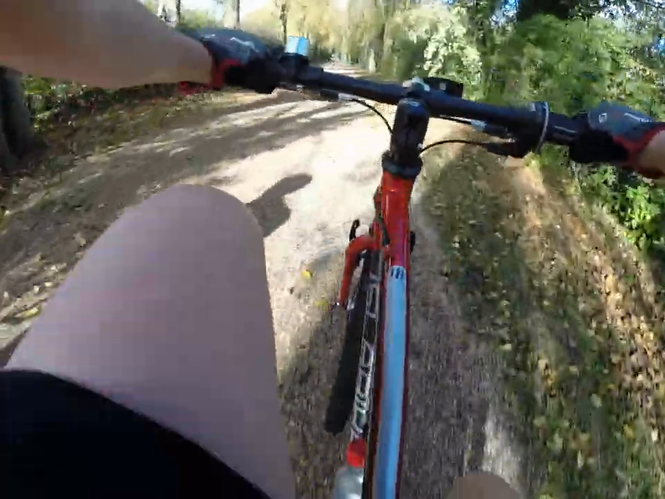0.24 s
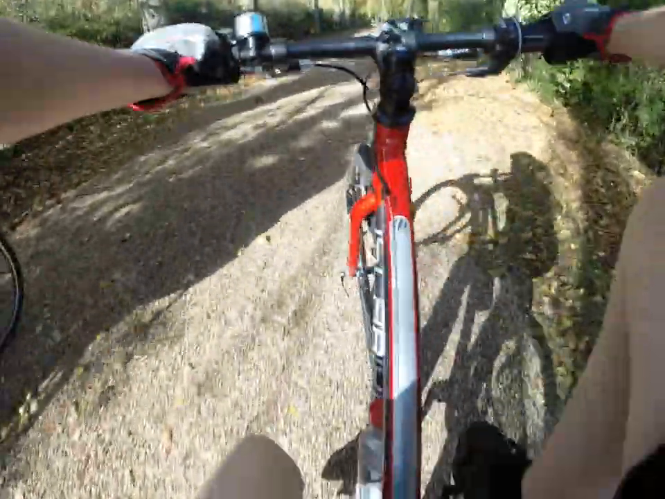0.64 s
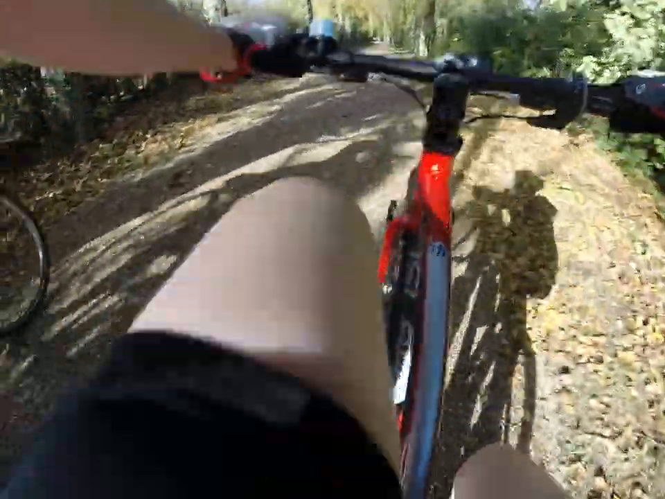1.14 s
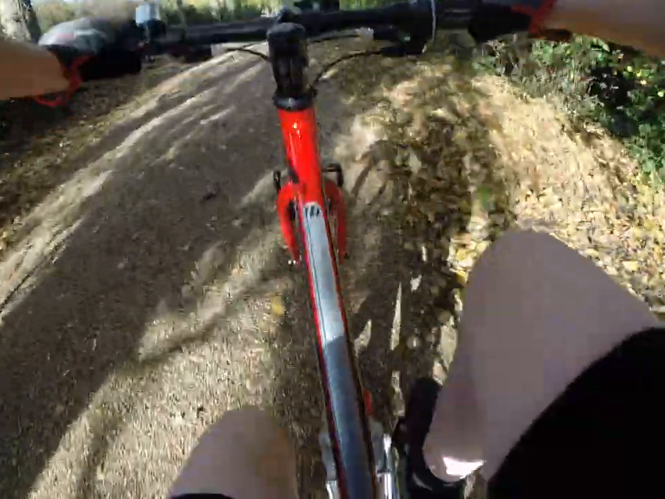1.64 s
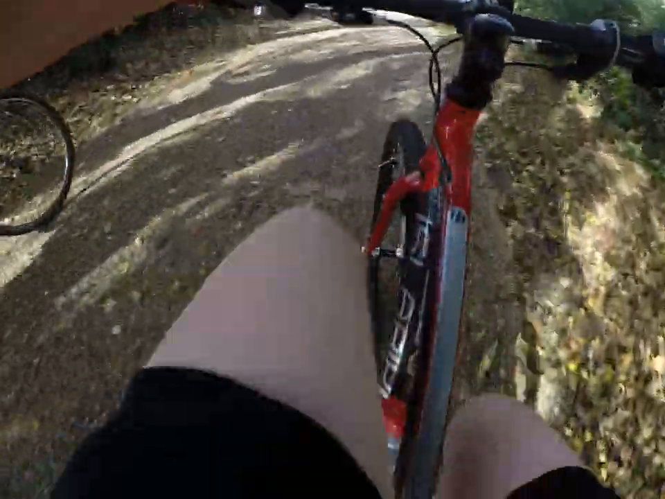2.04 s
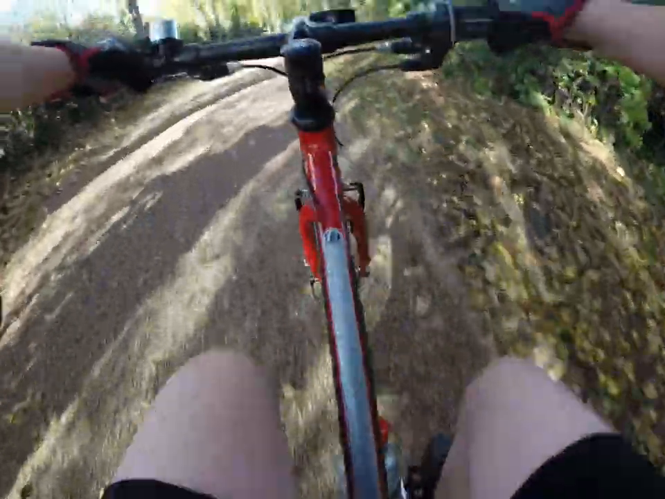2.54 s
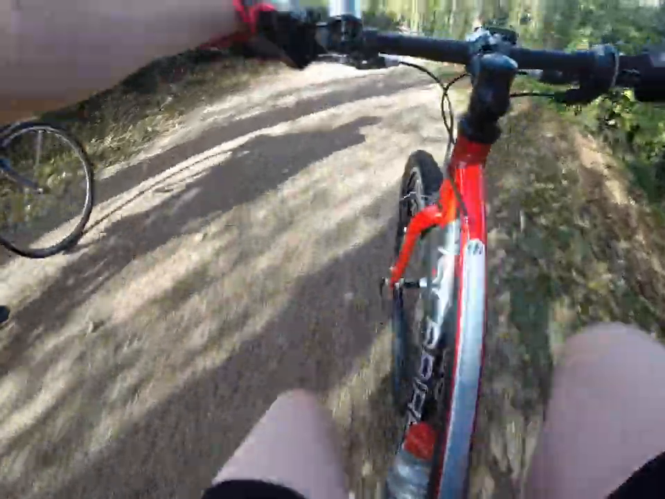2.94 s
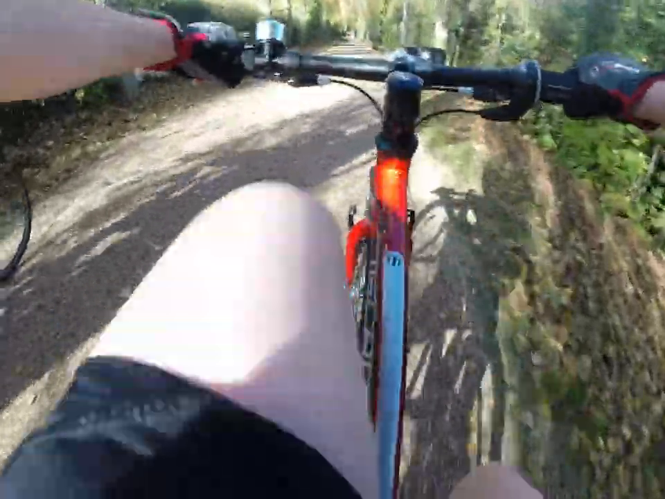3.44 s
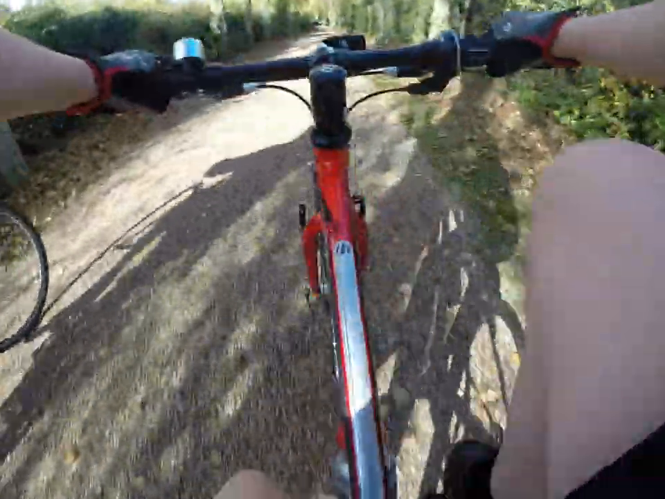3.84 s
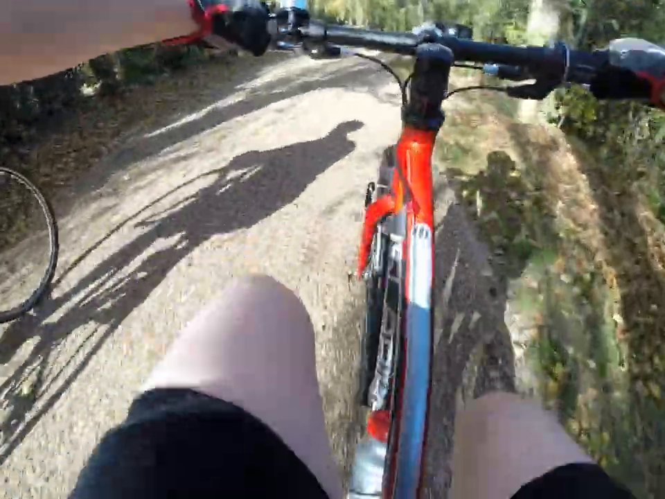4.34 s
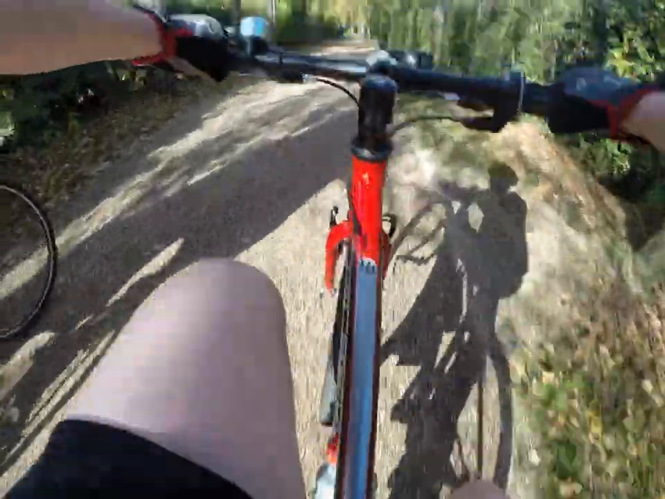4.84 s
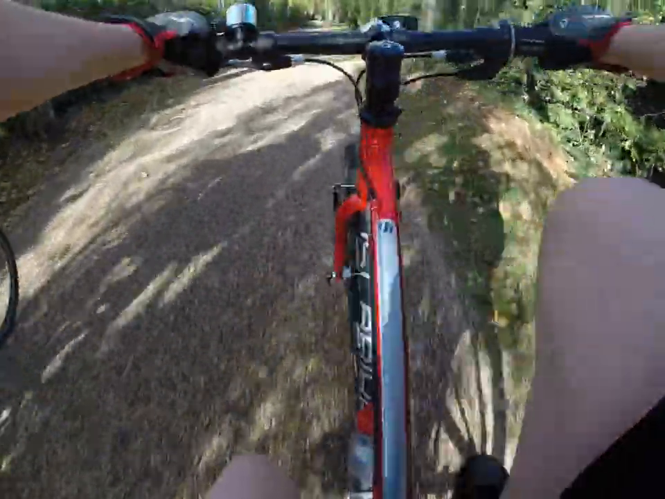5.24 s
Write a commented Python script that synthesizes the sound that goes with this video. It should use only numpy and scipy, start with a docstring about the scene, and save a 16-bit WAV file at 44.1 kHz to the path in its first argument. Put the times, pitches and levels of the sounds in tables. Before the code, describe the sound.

Heard from a cased camera on the rider's chest, bicycle tyres crunch over gravel without pause. Tiny pebbles ping and stones crack at irregular moments, with brief scrapes. Low wind pulses gently with the pedalling. Dull bumps shake the frame, strongest around 1.2, 2, 2.5 and especially 3.67 seconds, where the mount raps twice quickly. Outdoors, dry, no echo.

```python
"""A bicycle on a gravel path, heard from a cased camera on the rider's chest: tyre crunch throughout
(clustered ticks through gravel and case filters), over wind and a slowly growing drone (shaped noise).
From the first half second on: bumps (pulse, shuddering and rattling noise), pebble pings (short sines),
stone cracks (filtered bursts) and skids (narrow-band noise).
The mount knocks (decaying sines) once near 2.5 s and twice near 3.67 s."""
import sys
import numpy as np
from scipy import signal
from scipy.fft import rfft, irfft, next_fast_len
from scipy.io import wavfile
from scipy.ndimage import uniform_filter1d, map_coordinates

SR = 44100
rng = np.random.default_rng(int(sys.argv[2]) if len(sys.argv) > 2 else 0)


def put_to_file(sound):
    """Save the sound as 16-bit audio at rate SR, in the file named by the first command-line argument."""
    columns = np.atleast_2d(sound).T  # one column per channel
    safe = np.clip(columns, -1, 1)
    whole_steps = np.round(safe * 32767)
    wavfile.write(sys.argv[1], SR, whole_steps.astype(np.int16))


N = 242550

# grinding of coarse gravel under the tyres: (time [s], level [dB])
COARSE_GRIND = [(0.0, -41.5), (0.18, -48.5), (0.27, -44.5), (0.9, -42), (1.12, -45.5), (1.2, -44),
                (2.05, -44.5), (2.12, -43), (2.74, -45.5), (2.82, -43.5), (4.09, -44.5), (4.21, -46.0),
                (4.81, -41.5), (4.93, -46.5), (5.06, -41.0), (5.18, -47), (5.33, -42.5), (5.45, -44.5)]
# loose top layer of the path: (time [s], fine grit level [dB], dust spray level [dB])
LOOSE_LAYER = [(0.0, -46, -58.5), (0.86, -43.5, -55), (1.12, -50.5, -60), (1.42, -45.5, -56.5),
               (1.62, -45.5, -59), (1.8, -45.5, -58.0), (2.03, -49, -60.5), (2.23, -45.5, -54.5),
               (2.9, -47, -60), (3.15, -49, -57), (3.35, -47.5, -59.0), (3.44, -47, -59.0),
               (3.51, -48, -60), (3.9, -48.5, -58.5), (4.12, -45, -58), (4.23, -49.5, -61),
               (4.41, -44.5, -60.5), (4.64, -46.5, -56.5), (4.93, -48, -61.5), (5.45, -46, -60.5)]
# gravel noise spectrum: (frequency [Hz], relative density [dB])
GRAVEL_SPECTRUM = [(100, -43), (350, -13.5), (850, -14), (1200, -8), (1700, -4.5), (2150, -4), (2900, -.5),
                   (3900, -7), (5400, -14), (6500, -11), (7000, -23.5), (8200, -25), (13200, -27),
                   (15200, -40)]
# peaks and dips of the camera case: (centre [Hz], full width at half the dB [Hz], gain [dB])
CASE_RESONANCES = [(1498, 220, 6.5), (1672, 82, -6.5), (2370, 630, 2), (3154, 177, -3), (3426, 100, 5),
                   (4557, 630, 8.5), (5700, 780, 1.5), (6370, 900, -0.5), (7335, 460, 8.5), (8950, 260, -6),
                   (10570, 160, 9), (11740, 700, -3)]
# loudest pebbles squeezed out from under a tyre: (time of swell peak [s], swell level [dB])
PEBBLE_PINGS = [(0.111, -33.5), (0.395, -26.5), (0.430, -32.5), (0.454, -33), (0.6744, -24), (0.794, -30.5),
                (0.918, -31), (1.188, -31), (1.271, -29), (1.284, -31), (1.289, -36), (1.681, -29),
                (1.781, -30), (2.8126, -28.5), (3.2536, -28), (3.456, -32), (3.488, -28), (3.645, -21.5),
                (3.6735, -33), (3.872, -30), (4.0263, -30), (4.211, -31), (4.460, -34), (4.749, -30),
                (4.969, -24.5), (5.249, -30.5), (5.332, -26.5)]
# loudest stones cracking together: (time [s], level of loudest millisecond [dB], relative brightness [dB])
STONE_CRACKS = [(0.219, -35, -21), (0.4604, -34, 19), (0.87, -31, 1), (0.8886, -31, -2), (1.131, -35, 1),
                (1.5475, -33.5, 13), (1.91, -29, -7), (2.1797, -29.5, 0), (2.2844, -32, -7),
                (2.3677, -35.5, -19), (2.5937, -27.5, -3), (2.9546, -35, -13), (3.4106, -28, 4),
                (3.773, -32, 8), (3.7992, -31.5, 2), (4.0544, -31.5, -2), (4.1477, -33, 14),
                (4.7634, -34, 1), (5.128, -31, -1), (5.3465, -31, 3), (5.4225, -34.5, 20)]
# stones skidding under the tread: (time of swell peak [s], relative level [dB], centre [Hz])
STONE_SKIDS = [(0.325, -41, 3520), (0.354, -43.5, 3160), (1.155, -40.5, 3340), (1.434, -36, 2740),
               (2.123, -39.5, 2960), (2.956, -39.5, 3550), (3.929, -47, 2440), (4.097, -41, 4530),
               (5.131, -45, 2740)]
# jolts from bumps: (time of thud peak [s], thud level [dB], mount rattle level [dB])
BUMP_JOLTS = [(0.036, -41, -45), (0.266, -46, -43), (0.606, -38.5, -54), (0.8363, -34.5, -49),
              (1.0418, -32, -45.5), (1.2124, -21, -48), (1.24, -28.5, -47), (1.5758, -31, -34),
              (1.7272, -29.5, -39.5), (1.997, -22.5, -48), (2.374, -38.5, -47), (2.5006, -23, -41),
              (2.831, -27, -41), (3.265, -30, -39.5), (3.655, -20, -49), (3.6718, -16.5, -31.5),
              (3.684, -21.5, -45), (3.763, -32, -42), (3.789, -29.5, -47), (3.8977, -31, -46),
              (3.9699, -34, -47), (4.311, -41, -42), (4.782, -26, -37), (4.903, -28.5, -44.5),
              (5.0099, -31, -37.5), (5.059, -33, -50), (5.371, -30.5, -49)]
# shudder of the frame after a bump: (frequency [Hz], relative density [dB])
FRAME_SPECTRUM = [(35, -14), (65, -0.5), (95, 0), (140, -6), (220, -16), (320, -22.5), (700, -34.5),
                  (2000, -56)]
# rattle of the mount: (frequency [Hz], relative density [dB])
RATTLE_SPECTRUM = [(60, -30), (140, 3.5), (230, 16), (340, -1), (500, 2.5), (750, -11), (1300, -15),
                   (3000, -6), (9000, -47)]
# mount against its stop: (time [s], relative level [dB])
MOUNT_KNOCKS = [(2.4963, -31), (3.669, -30), (3.6789, -18.5)]
# modes of the mount, the highest standing for a pebble ping near the last knock:
# (frequency [Hz], relative level [dB], 60 dB decay time [s])
KNOCK_PARTIALS = [(334, -19, 0.017), (644, -19, 0.0048), (975, 3, 0.01), (1110, 1, 0.017), (2300, 2, 0.017)]
# wind on the camera: (time [s], buffet level before gusts and strokes [dB])
WIND_LEVEL = [(0.0, -33), (0.94, -33.5), (1.01, -31), (2.16, -30.5), (3.49, -31), (3.56, -38.5),
              (4.03, -26.5), (4.14, -33), (4.3, -27), (4.55, -33), (4.7, -22.5), (4.88, -34.5), (5.04, -25),
              (5.45, -29)]
# wind on the case: (frequency [Hz], relative density [dB])
BUFFET_SPECTRUM = [(6, -20), (14, 5.5), (22, 6.5), (33, -0.5), (45, -8.5), (60, -19.5), (120, -29.5),
                   (400, -86.5)]
# tyre rumble through frame and rider: (frequency [Hz], relative density [dB])
DRONE_SPECTRUM = [(30, -30.5), (60, 7), (92, 2), (116, -10), (135, -2.5), (185, -9), (225, -11), (290, -18),
                  (450, -17), (900, -24.5), (2500, -37)]

PING_HZ, PING_SCATTER_HZ = 2090, 45
STRAY_PINGS_PER_S, STRAY_PING_DB = 2.0, -41
STRAY_CRACKS_PER_S, STRAY_CRACK_DB = 4.0, -39.5
# one leg's stroke, and the first hardest push
STROKE_S, FIRST_PUSH_S = 0.417, 0.35
# swing either way with the pedal push
WIND_SWING_DB, DRONE_SWING_DB = 2, 0.5
# drone at the start, and its growth as the bicycle gathers speed
DRONE_START_DB, DRONE_DB_PER_S = -49.5, 0.6
TOP_HZ = 15300


def crunch():
    """Coarse stones grind, fine grit ticks and dust hisses; clumps in the path stir all three."""
    (coarse_db,) = curves(COARSE_GRIND)
    fine_db, dust_db = curves(LOOSE_LAYER)
    clumps_db = 0.98 * wobble(36)
    puffs_db = 0.46 * wobble(27.7)
    # the larger stones are heard in every band
    stones = contacts(rate_per_s=480, spread_db=2.5, life_s=0.0029)
    split_hz, dust_hz = 3800, 7700

    def coarse_band(hz):
        return 1 - above(hz, split_hz)

    def fine_band(hz):
        return above(hz, split_hz) * (1 - above(hz, dust_hz))

    def dust_band(hz):
        return above(hz, dust_hz)

    coarse = crunch_layer(coarse_band, stones, grit_share=0.093, stone_share=0.61)
    fine = crunch_layer(fine_band, stones, grit_share=0.16, stone_share=0.51)
    dust = crunch_layer(dust_band, stones, grit_share=0.14, stone_share=0.16)
    return (amp(coarse_db + clumps_db) * coarse
            + amp(fine_db + clumps_db) * fine
            + amp(dust_db + puffs_db + clumps_db) * dust)


def crunch_layer(band, stones, grit_share, stone_share):
    """Each contact is a cluster of tiny ticks, over a bed of ticks too small to tell apart; rms 1."""
    grit = contacts(rate_per_s=260, spread_db=4, life_s=0.0018)
    bed_share = abs(1 - grit_share - stone_share)
    power = bed_share + grit_share * grit + stone_share * stones
    ticks = rng.standard_normal(N) * (rng.random(N) < 16000 / SR)  # 16000 ticks per s
    clusters = patchy(np.sqrt(power) * ticks, depth_db=1.7)
    return unit(coloured(clusters, lambda hz: stone_colour(hz) * np.sqrt(band(hz))))


def contacts(rate_per_s, spread_db, life_s):
    """Power of many tiny stone contacts of uneven strength, each decaying exponentially; mean 1."""
    hits = rng.random(N) < rate_per_s / SR
    strength_db = spread_db * np.minimum(rng.standard_normal(N), 2)
    energy = amp(strength_db) ** 2
    power = signal.lfilter([1], [1, -np.exp(-1 / (life_s * SR))], hits * energy)
    return power / power.mean()


def patchy(x, depth_db):
    """Each passing stone favours its own pitch for a few hundredths of a second."""
    hz, _, spectra = signal.stft(x, SR, nperseg=512)
    field = uniform_filter1d(rng.standard_normal(spectra.shape), size=6, axis=0)
    field = uniform_filter1d(field, size=6, axis=1)
    reach = along([(600, 0.4), (2500, 1), (4000, 1), (9000, 0.5)], hz)[:, None]  # share of depth
    patches = spectra * amp(depth_db * reach * unit(field))
    return signal.istft(patches, nperseg=512)[1][:N]


def stone_colour(hz):
    """Gain of gravel noise through the camera case: gravel spectrum plus case peaks and dips."""
    case_db = sum(db * 0.5 ** ((2 * (hz - centre_hz) / width_hz) ** 2)
                  for centre_hz, width_hz, db in CASE_RESONANCES)
    return amp(along(GRAVEL_SPECTRUM, hz) + case_db)


def pings(rise_s=0.00183):
    """A pebble shoots out sideways: a few cycles near one pitch, swelling and dying at once."""
    track, t = np.zeros(N), np.arange(SR // 50) / SR
    swell = (t / rise_s * np.exp(1 - t / rise_s)) ** 4.6
    after_ring = 0.15 * (1 - np.exp(-t / rise_s)) * amp(-60 * t / 0.025)  # 60 dB in 25 ms
    for s, db in list(PEBBLE_PINGS) + strays(STRAY_PINGS_PER_S, STRAY_PING_DB):
        hz = PING_HZ + PING_SCATTER_HZ * rng.standard_normal()
        tone = np.sin(2 * np.pi * (hz * t + rng.random()))
        add(track, s - rise_s, amp(db) * (swell + after_ring) * tone)
    return track


def cracks(life_s=0.0027, low_hz=2100, high_hz=5600, stray_bright_db=4, scatter_db=8):
    """Two stones snap together: a decaying random-sign burst, each with its own brightness."""
    track, t = np.zeros(N), np.arange(SR // 50) / SR
    lesser = [(s, db, stray_bright_db + scatter_db * rng.standard_normal())
              for s, db in strays(STRAY_CRACKS_PER_S, STRAY_CRACK_DB)]

    def band(hz):
        return np.sqrt(above(hz, low_hz) * (1 - above(hz, high_hz)) + 0.06)

    def tilt(hz, bright_db):
        return amp((bright_db + 1.5) * (above(hz, 3850) - 0.63 * above(hz, 4900)))

    for s, db, bright_db in list(STONE_CRACKS) + lesser:
        burst = rng.choice([-1, 1], len(t)) * np.exp(-t / life_s)
        click = coloured(burst, lambda hz: stone_colour(hz) * band(hz) * tilt(hz, bright_db))
        peak = np.sqrt(uniform_filter1d(click ** 2, size=44).max())  # loudest millisecond, rms
        add(track, s - 0.0007, amp(db) * click / peak)
    return track


def strays(per_s, typical_db, spread_db=4.0, count=40):
    """Lesser events at random, as (time [s], level [dB]), with exponential gaps."""
    times_s = np.cumsum(rng.exponential(1 / per_s, count))
    levels_db = typical_db + spread_db * rng.standard_normal(count)
    return [(s, db) for s, db in zip(times_s, levels_db) if s < N / SR]


def skids(life_s=0.0088, width_hz=330, trim_db=-1.0):
    """A stone slides a little way: a short narrow scrape that swells and fades."""
    track, t = np.zeros(N), np.arange(SR // 10) / SR
    middle_s = t.mean()
    swell = np.exp(-((t - middle_s) / life_s) ** 2 / 2)
    for s, db, centre_hz in STONE_SKIDS:
        hiss = rng.standard_normal(len(t))
        scrape = coloured(hiss, lambda hz: 1 / (1 + ((hz - centre_hz) / width_hz) ** 4))
        scrape = steadied(scrape, span_s=0.008)
        add(track, s - middle_s, amp(db + trim_db) * swell * scrape)
    return track


def bumps(push_s=0.0026, rise_s=0.0096, fall_s=0.0055, shudder_db=-11, shudder_s=0.015):
    """Each bump gives the camera one springy push, makes the frame shudder and the mount rattle."""
    thuds, frame_power, rattle_power = np.zeros(N), np.zeros(N), np.zeros(N)
    lead_s = 0.06
    t = np.arange(SR // 6) / SR - lead_s  # zero at the thud peak
    thud = (1 - (t / push_s) ** 2) * np.exp(-(t / push_s) ** 2 / 2)
    flutter = np.exp(np.minimum(t / rise_s, -t / fall_s))
    shudder = amp(shudder_db) * np.exp(-(t / shudder_s) ** 2 / 2)
    for s, thud_db, rattle_db in BUMP_JOLTS:
        add(thuds, s - lead_s, amp(thud_db) * thud)
        add(frame_power, s - lead_s, (amp(thud_db) * shudder) ** 2)
        add(rattle_power, s - lead_s, (amp(rattle_db) * flutter) ** 2)
    frame = np.sqrt(frame_power) * steadied(noise(FRAME_SPECTRUM), span_s=0.023)
    rattle = np.sqrt(rattle_power) * steadied(noise(RATTLE_SPECTRUM), span_s=0.017)
    return thuds + frame + rattle


def knocks(onset_s=0.00044, trim_db=-10):
    """The plastic mount strikes its stop: its modes ring down, topped by a pebble-like ping."""
    track, t = np.zeros(N), np.arange(SR // 20) / SR
    ring = sum(amp(partial_db - 60 * t / t60_s) * np.sin(2 * np.pi * hz * t)
               for hz, partial_db, t60_s in KNOCK_PARTIALS)
    for s, db in MOUNT_KNOCKS:
        add(track, s, amp(db + trim_db) * ring * (1 - np.exp(-t / onset_s)))
    return track


def drone(puff_limit_db=3):
    """Tyres drone through frame and rider; lumps make puffs of limited height."""
    trend_db = DRONE_START_DB + DRONE_DB_PER_S * np.arange(N) / SR
    puffs_db = np.minimum(4.5 * wobble(28), puff_limit_db)
    level_db = trend_db + DRONE_SWING_DB * pedalling() + puffs_db
    return amp(level_db) * steadied(noise(DRONE_SPECTRUM), span_s=0.058)


def wind(gust_db=1.0):
    """Wind buffets the case: deep noise swelling with gusts and each pedal stroke."""
    (buffet_db,) = curves(WIND_LEVEL)
    level_db = buffet_db + WIND_SWING_DB * pedalling() + gust_db * wobble(14)
    return amp(level_db) * steadied(noise(BUFFET_SPECTRUM), span_s=0.11)


def pedalling():
    """Push on the pedals, from -1 to 1, a cosine peaking once for each leg."""
    return np.cos(2 * np.pi * (np.arange(N) / SR - FIRST_PUSH_S) / STROKE_S)


def amp(db):
    """Decibels to gain."""
    return 10 ** (np.asarray(db) / 20)


def unit(x):
    """Scale to rms 1."""
    return x / np.sqrt(np.mean(x ** 2) + 1e-20)


def along(points, hz):
    """Read (frequency [Hz], value) points on a log frequency axis."""
    f, v = np.transpose(points)
    return np.interp(np.log(hz + 1), np.log(f + 1), v)


def above(hz, edge_hz):
    """Share of the power on the high side of a soft edge."""
    return 1 - 1 / (1 + (hz / edge_hz) ** 14)


def curves(rows):
    """One value per sample for each column after the time."""
    s, *columns = np.transpose(rows)
    return [np.interp(np.arange(N) / SR, s, column) for column in columns]


def wobble(knots_per_s):
    """A smooth random curve: spline through random knots."""
    knots = rng.standard_normal(int(N * knots_per_s / SR) + 4)
    return map_coordinates(knots, [np.arange(N) * knots_per_s / SR])


def coloured(x, gain):
    """Filter x causally (minimum phase, by cepstrum) with a gain that is a function of Hz."""
    m = 2 * next_fast_len(len(x) // 2 + 4096)
    cepstrum = irfft(np.log(np.maximum(gain(np.fft.rfftfreq(m, 1 / SR)), 1e-6)))
    # fold onto positive time
    cepstrum[1:m // 2] *= 2
    cepstrum[m // 2 + 1:] = 0
    response = np.exp(rfft(cepstrum))
    return irfft(rfft(x, m) * response)[:len(x)]


def noise(spectrum):
    """Noise of rms 1 with the given spectrum."""
    return unit(coloured(rng.standard_normal(N), lambda hz: amp(along(spectrum, hz))))


def steadied(x, span_s):
    """Noise with its chance swells slower than the span evened out; rms 1."""
    power = uniform_filter1d(np.abs(signal.hilbert(x)) ** 2, max(int(span_s * SR), 1))
    return unit(x / np.sqrt(np.abs(power) + 1e-6))


def add(track, s, sound):
    """Mix a sound into the track from time s."""
    start = max(round(s * SR), 0)
    part = track[start:start + len(sound)]
    part += sound[:len(part)]


def scene():
    """Sum of all sources at the one microphone."""
    stones = crunch() + pings() + cracks() + skids()
    jolts = bumps() + knocks()
    return (stones + jolts + drone() + wind())[None]


def record(dry):
    """The camera keeps nothing above its band limit."""
    m = next_fast_len(N + SR // 2)
    kept = np.fft.rfftfreq(m, 1 / SR) < TOP_HZ
    return irfft(rfft(dry, m) * kept, m)[..., :N]


dry = scene()
out = record(dry)
put_to_file(out)
```